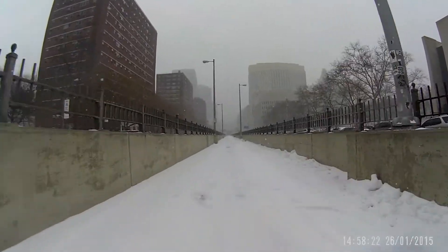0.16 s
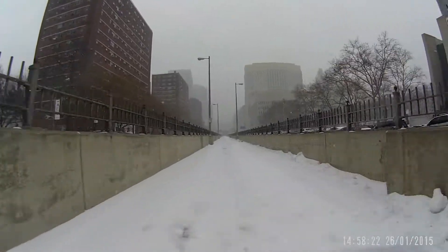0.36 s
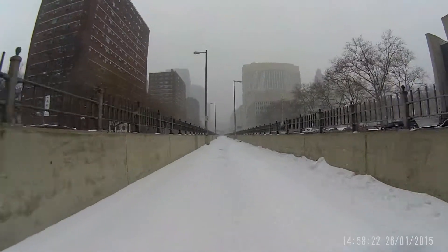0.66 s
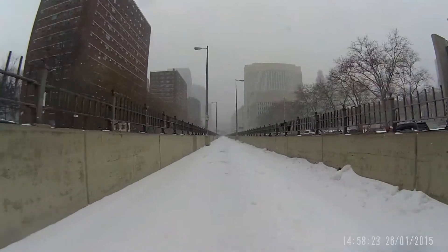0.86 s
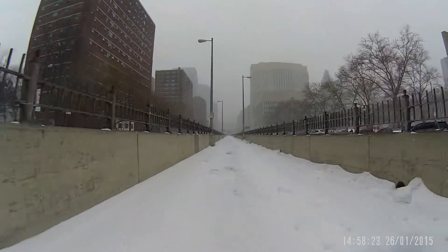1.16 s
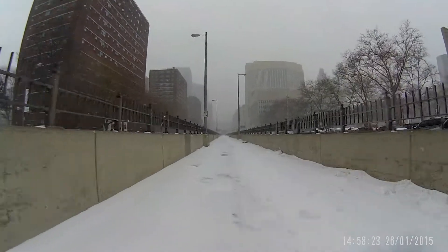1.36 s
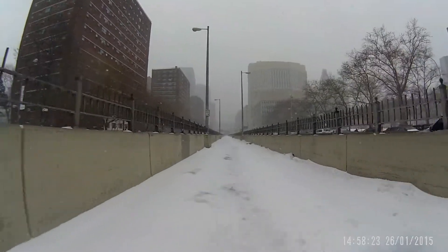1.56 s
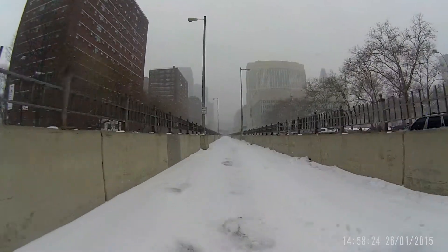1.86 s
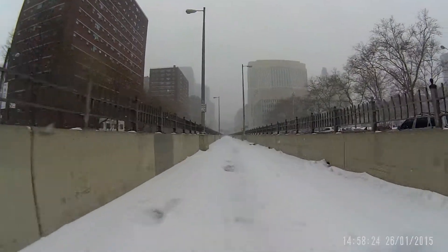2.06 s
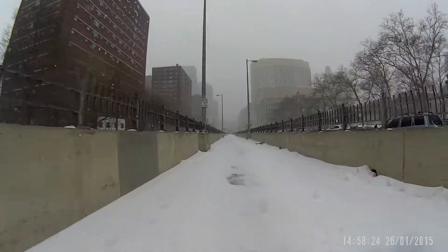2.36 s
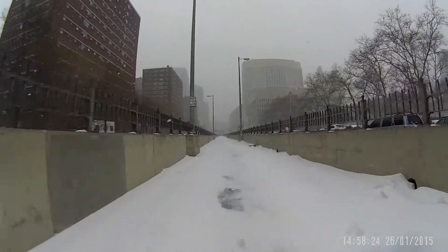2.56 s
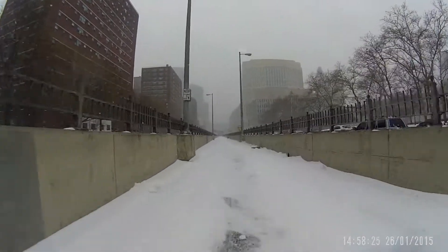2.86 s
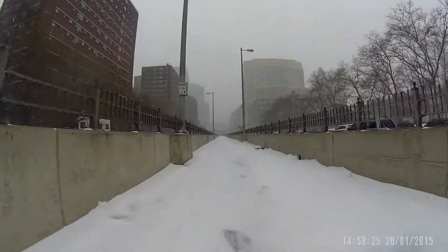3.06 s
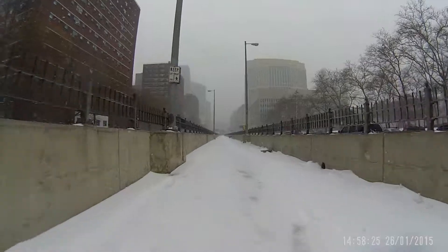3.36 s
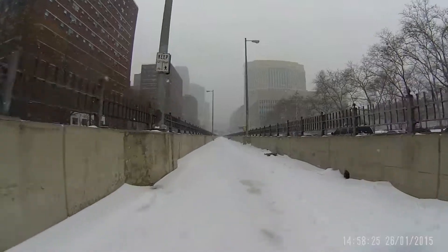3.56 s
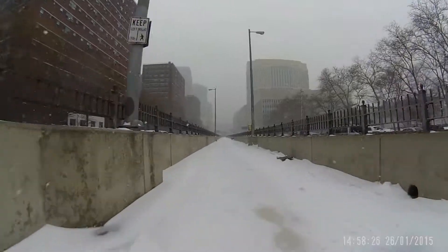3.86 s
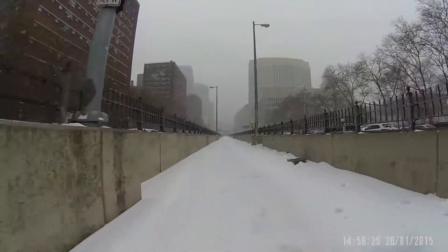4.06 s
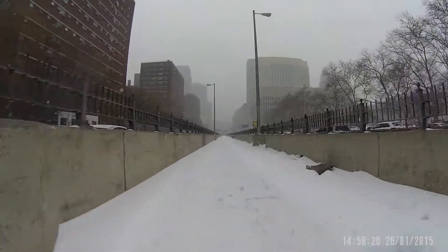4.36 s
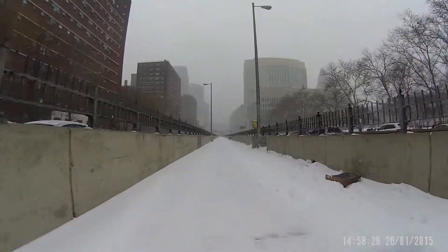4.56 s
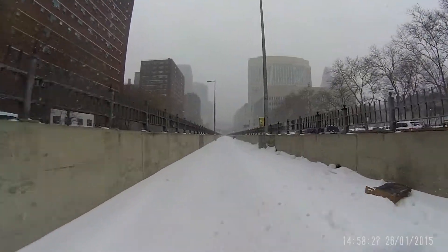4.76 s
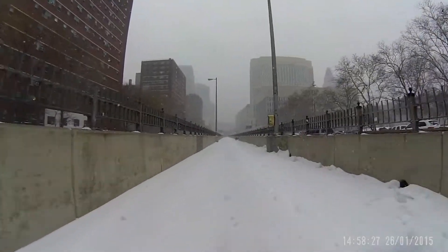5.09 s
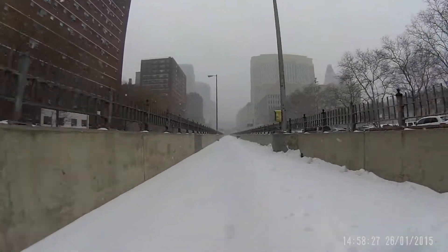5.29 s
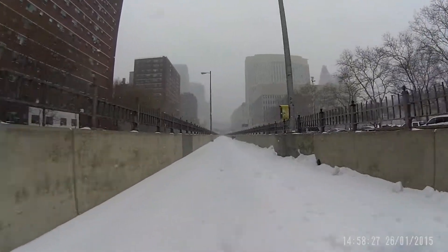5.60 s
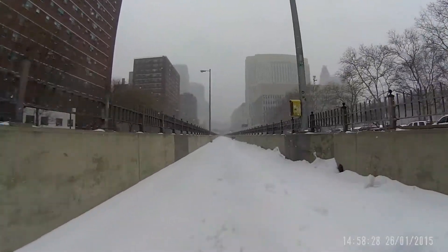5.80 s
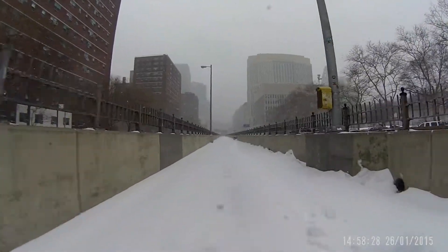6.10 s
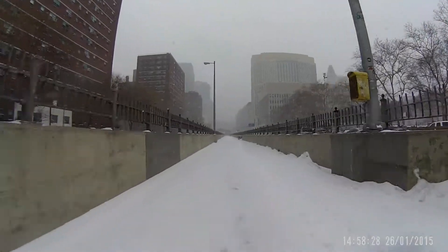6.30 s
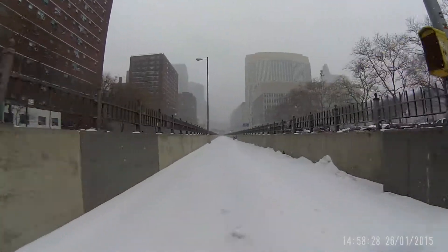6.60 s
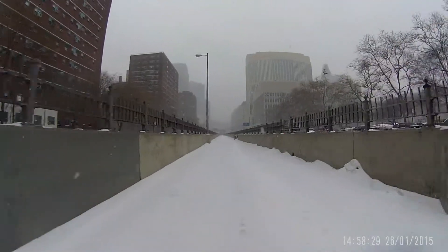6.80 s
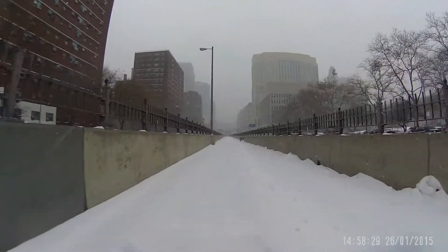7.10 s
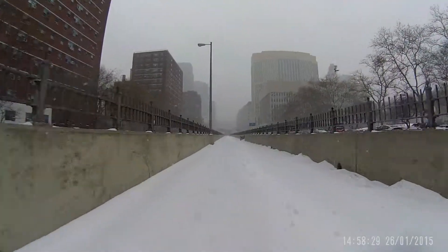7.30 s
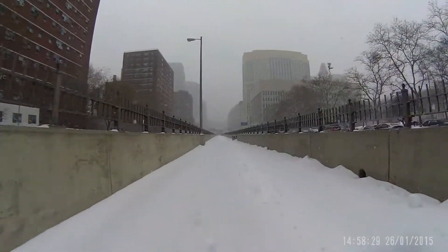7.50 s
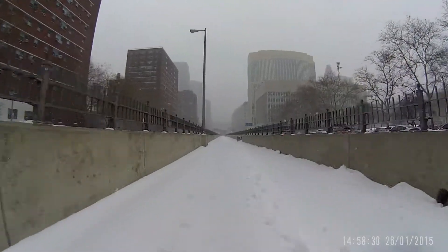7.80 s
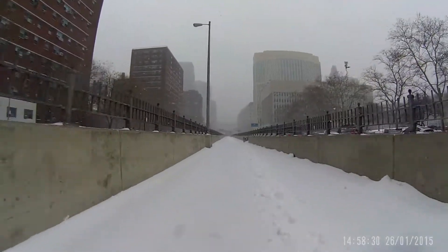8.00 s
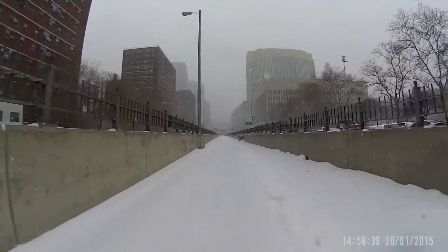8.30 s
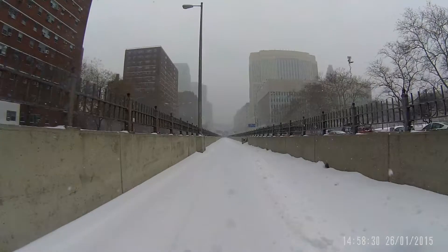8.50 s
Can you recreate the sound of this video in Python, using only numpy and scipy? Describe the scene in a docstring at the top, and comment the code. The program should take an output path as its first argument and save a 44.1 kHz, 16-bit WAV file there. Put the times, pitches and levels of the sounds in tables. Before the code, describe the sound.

Low, wavering rumble of a bike on a snowy path, heard from a frame-mounted enclosed microphone, with dull jolts, faint crackle and icy ticks.

```python
"""A bicycle rolls along a snow-covered path, heard inside a closed housing mounted on its frame.
From the start the frame's low resonances rumble, tyres churn, scrunch and crackle as filtered random
grains, and filtered noise makes soft wind and a faint hiss with a thin whine. Soon crust crumbles,
crystals snap, hollow notes and squeezed snow swell up, lumps pop, and booms and ruts jolt the bicycle.
Then the mount knocks in decaying sines, and after two seconds icy flakes tick on the housing."""
import sys
import numpy as np
from scipy import signal
from scipy.fft import rfft, irfft
from scipy.io import wavfile
from scipy.ndimage import uniform_filter1d

SR = 44100
rng = np.random.default_rng(int(sys.argv[2]) if len(sys.argv) > 2 else 0)


def wrap_up_sound(samples):
    """Save the sound to the file named by the first command line argument, as 16-bit audio."""
    columns = np.atleast_2d(samples).T
    # keep every value between -1 and 1, then stretch to whole-number steps
    tamed = np.clip(columns, -1, 1)
    steps = np.round(tamed * 32767).astype(np.int16)
    wavfile.write(sys.argv[1], SR, steps)


N = 381465
TIME = np.arange(N) / SR

# bumps in the packed snow: middle t/s, length/s, added shaking/dB re level snow,
# hardness/(dB per octave): soft swells below 0, fine ridges above
BUMPS = [(0.21, 0.08, 2, -8), (0.461, 0.069, 5.4, 2), (0.831, 0.23, 0.82, -3.5), (0.998, 0.023, 9.7, -1),
         (1.25, 0.2, 1.6, -8), (1.52, 0.029, 3.5, -5), (1.699, 0.025, 7.2, -7.5), (2.159, 0.03, 4.1, 4),
         (2.333, 0.034, 4, -7), (2.47, 0.049, 6.4, -14.5), (2.62, 0.081, 0.97, -4.5),
         (2.885, 0.034, 3.6, 0.5), (3.23, 0.077, 1.6, -3), (3.421, 0.068, 3.5, 0), (3.603, 0.036, 4.8, -22),
         (3.84, 0.041, 2.4, -5), (4.56, 0.039, 1.3, -23), (4.96, 0.092, 2.9, -2), (5.139, 0.048, 0.99, 0),
         (5.409, 0.023, 3.6, -4), (5.83, 0.078, 5.4, -6), (6.33, 0.057, 3.6, -6.5), (6.56, 0.16, 4.3, -5.5),
         (7.012, 0.014, 10.7, -8), (7.08, 0.038, 2, -3), (7.761, 0.019, 8.2, -1), (8.05, 0.094, 4.7, -3),
         (8.42, 0.055, 3, -13)]
# smooth patches where the frame calms: middle t/s, length/s
GLIDES = [(0.084, 0.035), (0.359, 0.025), (1.056, 0.022), (1.462, 0.02), (1.637, 0.092), (1.85, 0.07),
          (2.032, 0.065), (2.22, 0.034), (2.403, 0.036), (2.795, 0.03), (3.043, 0.062), (3.528, 0.068),
          (3.756, 0.034), (4.07, 0.096), (4.658, 0.073), (5.33, 0.041), (5.538, 0.035), (5.957, 0.02),
          (6.17, 0.039), (6.86, 0.026), (7.86, 0.054)]
GLIDE_DB = -5  # shaking on a smooth patch, relative to level snow

# resonances of frame, fork and mount: f/Hz, width/Hz, level/dB
FRAME_MODES = [(83.8, 20.2, -9.5), (95.4, 25.2, -6.5), (119.5, 12.1, 1), (141.3, 27.6, -1.5),
               (178.67, 18.5, -3), (194.2, 13.6, -1.5), (215.8, 38, -15.5)]
FRAME_DB, FRAME_WAVER_DB = -41, 1.13  # rumble on level snow; wander of its level
MODE_WAVER_DB, MODE_DRIFT = 2.0, 0.015  # each resonance's own wander: level; pitch as a share

# softer and firmer stretches of snow under the tyres: t/s, churn level/dB, scrunch level/dB
SNOW = [(0.1, -55.5, -70.5), (0.33, -56.5, -73), (0.39, -51.5, -70.5), (0.59, -54.5, -70), (0.63, -57, -71),
        (0.85, -56, -77), (1.05, -57, -71.5), (1.65, -59, -71), (1.78, -56, -70.5), (3.05, -58, -72.5),
        (3.35, -55, -72.5), (3.55, -57.5, -72.5), (3.85, -55.5, -71), (4.65, -59.5, -72),
        (5.65, -59, -74.5), (5.97, -58, -68.5), (6.5, -58.5, -72.5), (7.85, -59.5, -73), (8.62, -59.5, -72)]
# crisp crust breaking under the tyres: t/s, level/dB
CRUST = [(0.1, -82), (0.25, -81.5), (1.25, -80.5), (1.6, -84), (1.74, -81), (2.65, -83.5), (3.35, -86),
         (3.68, -80), (4.2, -83), (4.75, -85), (5.1, -85.5), (5.8, -85), (5.93, -83.5), (6.2, -84.5),
         (6.65, -85.5), (7.1, -84.5), (7.38, -82.5), (7.9, -87.5), (8.35, -83), (8.62, -88)]
# tyre churn carried through the mount: f/Hz, level/(dB per Hz)
CHURN = [(150, -13), (250, 0), (305, 2), (390, -2), (470, -6.5), (575, -4), (640, -10), (690, -7),
         (760, -18), (1000, -29.5), (2500, -62.5)]
# scrunch of firmer snow: f/Hz, level/(dB per Hz)
SCRUNCH = [(300, -8), (750, 2.5), (900, 3), (1100, 0), (1330, -11), (1550, -22), (1800, -15.5), (2600, -21),
           (5000, -50)]
# housing resonances that grains set ringing: f/Hz, width/Hz, level/dB
SHELL_MODES = [(1545, 250, 0.5), (2640, 3200, 2.5), (3740, 200, -3.5), (4070, 120, -2.5),
               (4300, 1200, -10.5), (5000, 400, -3.5), (6230, 310, -6.5), (7230, 580, -3),
               (8250, 560, -7.5), (11400, 2200, -13)]
CRUNCH_DB = 0.5  # coarse crunch, relative to the crust
CRYSTAL_TOP_HZ = 8900  # breaking crust has little above this
# dB gained for each dB of load
CHURN_PER_LOAD, SCRUNCH_PER_LOAD, CRUNCH_PER_LOAD, BUFFET_PER_LOAD = 0.41, 0.19, 0.17, 0.12
# pitches of the finest crackle: f/Hz, width/Hz, level/dB re crust
CRACKLE_MODES = [(1500, 380, -3), (3955, 800, -8.5), (5010, 680, -10.5), (7250, 1000, -11.5)]

# larger lumps of snow collapsing under a tyre: t/s, peak level/dB, brightness/(dB per octave)
LUMPS = [(0.417, -48, 0), (0.810, -45, 0), (0.869, -50, 0), (1.051, -44.5, -1), (1.273, -45.5, -1),
         (1.514, -49.5, 0), (1.845, -41.5, 4.5), (2.523, -48, -2), (3.252, -46, -4), (3.407, -43, -5),
         (3.935, -44.5, -3), (4.779, -48.5, 0), (5.104, -49, -3), (6.045, -49, -1), (6.167, -48, -1),
         (6.429, -45, 0), (6.497, -44.5, 2), (6.685, -49, -3), (6.758, -45.5, 0), (7.665, -46, -1),
         (8.308, -50, 0), (8.403, -51, -1)]
# dull pop of a collapsing lump: f/Hz, level/dB
POP = [(150, -26.5), (330, 8), (600, 5.5), (900, -6), (1450, -14.5), (2000, -30.5), (5000, -47),
       (16000, -87)]

# gusts pressing on the housing: t/s, level/dB
WIND = [(0.35, -65), (0.85, -54), (1.4, -61), (2.0, -62), (2.4, -59.5), (2.95, -69), (3.45, -68),
        (3.8, -54), (4.1, -63), (4.9, -61), (5.5, -72), (5.9, -60.5), (6.6, -68), (7.4, -60.5), (7.8, -66),
        (8.35, -67), (8.62, -59)]
# low tone of the buffeting: f/Hz, level/dB
BUFFET = [(15, -4.0), (30, 5.5), (50, 5.0), (75, -3.5), (150, -16.5), (500, -70.0)]
# steady hiss of the microphone: f/Hz, level/(dB per Hz)
HISS = [(100, 2), (1500, 5.5), (2600, 3.5), (3200, -2), (4000, -3), (5000, -5.5), (5900, -6.5), (7300, -9),
        (9500, -9.5), (12500, -9.5), (14000, -39.5), (16000, -30)]

# brittle crust crumbling in clusters of grains: middle t/s, length/s, level/dB
CRUMBLES = [(0.212, .04, -78), (0.307, .03, -76), (0.5, 0.055, -81), (0.657, 0.031, -74), (0.806, .06, -84),
            (0.924, .05, -74), (1.198, .07, -76), (1.776, .06, -83), (2.016, 0.027, -83), (2.54, .05, -79),
            (3.684, .06, -80), (4.235, 0.039, -74.5), (4.59, 0.038, -78), (4.78, .035, -74),
            (4.95, 0.045, -82), (5.643, 0.015, -74.5), (5.93, .02, -75), (5.985, .03, -77),
            (6.38, .03, -86), (6.67, 0.072, -77), (7.39, .03, -76), (8.1, .05, -75.5), (8.352, 0.058, -82)]
# ruts jolting the bicycle: t/s, thump level/dB, crushed snow level/dB
RUTS = [(0.479, -39, -75), (0.881, -45, -76), (1.704, -39, -71), (2.152, -45, -85), (2.344, -41, -78),
        (2.368, -55, -64), (4.581, -60, -74), (4.948, -38, -69), (5.65, -42, -76), (5.93, -41, -68),
        (6.381, -41, -74), (7.02, -55, -68), (7.4982, -35, -83), (8.329, -43, -69)]
# snow crushed in a rut: half length; levels of its grit and crust
CRUSH_S, CRUSH_GRIT_DB, CRUSH_CRUST_DB = 0.016, -2.5, -9

# single larger crystals snapping: t/s, peak level/dB, f/Hz
SNAPS = [(0.2864, -64, 4940), (0.501, -60, 4960), (0.7223, -68, 4720), (0.7746, -67, 7470),
         (0.8205, -61, 5190), (0.9123, -63, 4690), (0.9294, -65, 5020), (1.2935, -63, 5030),
         (1.765, -66, 4740), (1.7868, -62, 4620), (1.9305, -65, 4980), (1.9904, -69, 5260),
         (2.0088, -64, 5030), (2.3271, -60, 4780), (2.362, -57.5, 4850), (2.9612, -63, 4800),
         (3.6272, -65, 7280), (4.1739, -64, 5160), (4.4034, -63, 4690), (4.6243, -58, 5030),
         (4.7706, -66, 4900), (5.9214, -57.5, 4540), (5.9374, -67, 4770), (5.9678, -64, 5000),
         (6.114, -64, 5100), (6.3769, -66, 5180), (6.5914, -66, 4760), (6.6009, -62, 7130),
         (6.6763, -64, 5160), (7.3801, -67, 7080), (7.641, -63, 5090), (8.3354, -67, 5350),
         (8.3649, -61, 4920)]
# colour of such a snap: f/Hz, level/dB
SNAP = [(500, -22), (1500, -10), (2800, -11.5), (4000, 7.5), (5000, -1.5), (5900, -7), (7300, 1.5),
        (8500, 3), (10000, -13), (15000, -35)]
# passing hollow notes in the churn: middle t/s, length/s, f/Hz, level/dB
HOLLOWS = [(0.327, 0.072, 553, -60), (2.154, 0.068, 290, -56), (2.248, 0.051, 550, -73),
           (3.15, 0.34, 300, -56.5), (3.28, 0.091, 308, -60), (3.43, 0.072, 550, -56.5),
           (3.464, 0.046, 328, -59), (3.83, 0.14, 553, -59), (3.954, 0.045, 540, -58),
           (4.26, 0.1, 552, -58.5), (4.417, 0.098, 576, -61), (6.003, 0.22, 301, -56),
           (6.474, 0.16, 347, -60), (7.683, 0.49, 554, -68.5)]
# firm snow giving way in scrunching bursts: middle t/s, length/s, level/dB
SQUEEZES = [(0.366, 0.013, -62), (0.38, 0.01, -57), (0.407, .007, -57), (0.42, 0.012, -57),
            (0.437, .012, -56), (0.459, 0.022, -57.5), (0.495, 0.022, -57), (0.511, 0.0092, -58.5),
            (0.555, 0.022, -56.5), (0.572, 0.0068, -56), (0.578, 0.011, -54), (0.732, 0.016, -60),
            (0.829, 0.02, -57), (0.866, .018, -56), (2.353, .022, -56.5), (5.885, 0.0091, -57.5),
            (6.01, 0.048, -73), (6.436, .025, -60), (6.502, 0.024, -57.5)]
# colour of such a burst: f/Hz, level/(dB per Hz)
SQUEEZE = [(200, -29.5), (420, 13.5), (600, 6), (850, 5), (1300, -1), (1650, -5), (2000, -18.5),
           (5000, -45)]
# bumps that set one frame resonance booming: middle t/s, length/s, f/Hz, level/dB
RINGS = [(0.482, 0.069, 120, -34), (0.856, 0.13, 79, -39), (0.932, 0.094, 195, -38),
         (2.15, 0.13, 86, -39.5), (2.317, 0.12, 121, -31.5), (2.88, 0.081, 122, -35),
         (3.266, 0.22, 124, -40), (3.712, 0.089, 116, -40), (3.928, .15, 106, -48.5),
         (4.355, 0.055, 120, -31.5), (4.762, .1, 120, -38.5), (5.154, .12, 119, -35),
         (5.487, 0.065, 84, -39.5), (6.737, 0.14, 119, -37.5), (7.312, 0.093, 82, -40.5),
         (8.03, 0.14, 119, -39)]

# the mount knocking in its play: t/s, level/dB, brightness/(dB per octave)
KNOCKS = [(0.88, -65, 1), (1.705, -60, 0.5), (2.152, -63, -8), (2.174, -64, -1), (2.346, -58.5, 2.5),
          (2.371, -58.5, -2), (4.934, -66, 0), (4.950, -65, -1), (4.9545, -60, -6), (4.9726, -59.5, -4),
          (5.922, -61, -8), (6.348, -64, -3), (6.378, -65, -4), (6.411, -64, -7), (7.4961, -60, 3.5),
          (7.4996, -54, 1), (7.518, -64, -4)]
# resonances of the mount: f/Hz, decay/s, level/dB
MOUNT_MODES = [(830, 0.00067, 1), (1550, 0.0023, 0.5), (2420, 0.00023, 5.5), (3540, 0.0017, -8),
               (4420, 0.0011, -1.5), (5130, 0.00072, -4), (6430, 0.00097, -6), (8160, 0.00086, -15)]
# flakes striking the housing: t/s, peak level/dB, brightness/(dB per octave),
# struck spot f/Hz, its ring level/dB, top of the tick f/Hz
FLAKES = [(2.219, -44, 8.5, 7200, 3, 13500), (3.0818, -29.5, 3, 4800, -11, 15000),
          (3.654, -53, 13, 9000, 10, 12500), (3.669, -48, 11, 4900, -4, 8500),
          (3.713, -44, 10, 4600, -14, 9300), (3.737, -58, 12, 8000, 2, 12000),
          (4.064, -54, 15, 5200, 10, 13000), (4.102, -50, 6, 2200, 9, 13500),
          (5.027, -51.5, 11, 7840, 2, 13500), (5.91, -61, 9, 7400, 3, 12000),
          (6.526, -56, 8, 7040, -1, 13500), (6.928, -52, 8, 6500, 7, 13000)]
# response of the housing to a tiny knock: f/Hz, level/dB
HOUSING = [(300, 2), (600, 16), (1000, 7.5), (2300, 7), (3500, 2), (5100, 3.5), (5800, -11), (6400, -4.5),
           (7500, -3.5), (9500, -16.5), (10600, -12), (13600, -12.5), (14600, -33), (16000, -60)]
TOP_HZ = 15800  # top of the whole sound


def undb(db):
    """Decibels to gain."""
    return 10 ** (np.asarray(db) / 20)


def unit(x):
    """Scale to rms 1."""
    return x / np.sqrt(np.mean(x ** 2))


def curve(table, column):
    """One column of a control table, interpolated at every sample."""
    rows = np.array(table)
    return np.interp(TIME, rows[:, 0], rows[:, column])


def swell(middle, length):
    """A smooth rise and fall, 1 at its middle."""
    out = np.zeros(N)
    near = slice(*np.searchsorted(TIME, [middle - 2 * length, middle + 2 * length]))
    out[near] = np.exp(-(2 * (TIME[near] - middle) / length) ** 2)
    return out


def colour(x, points, tilt_db=0, size=2048):
    """Causal minimum-phase filter through (Hz, dB) points, tilted by so many dB an octave."""
    hz, db = np.transpose(points)
    octave = np.log2(np.maximum(np.arange(size // 2 + 1), 1) * SR / size)
    gain_db = np.interp(octave, np.log2(hz), db) + tilt_db * (octave - np.mean(octave))
    # folding the cepstrum onto positive time makes the filter causal
    cepstrum = irfft(np.log(undb(gain_db)))
    cepstrum[1:size // 2] *= 2
    cepstrum[size // 2 + 1:] = 0
    impulse = irfft(np.exp(rfft(cepstrum)))
    return signal.fftconvolve(x, impulse)[:len(x)]


def resonate(x, hz, width):
    """A steep resonance: the same band-pass twice."""
    b, a = signal.iirpeak(hz, hz / width, fs=SR)
    return signal.lfilter(b, a, signal.lfilter(b, a, x))


def soften(x, top_hz):
    """A softer contact takes away the treble above this pitch."""
    return signal.sosfilt(signal.butter(8, min(top_hz, .45 * SR), fs=SR, output="sos"), x)


def steady(x, seconds):
    """Hold a vibration near rms 1 over spans of this length; quicker beating stays."""
    span = int(seconds * SR)
    power = uniform_filter1d(uniform_filter1d(x ** 2, span), span)
    return x / np.sqrt(power + 1e-18)


def walk(rate):
    """A smooth random wander: levels held 1 / rate s, slewed twice and scaled to rms 1."""
    span = int(SR / rate)
    held = rng.standard_normal(4096)[np.arange(N) // span]
    return unit(uniform_filter1d(uniform_filter1d(held, span), span))


def grains(rate, spread_db):
    """Random tiny fractures, rate a second: many weak, a few strong; reversed by a negative spread."""
    hit = rng.random(N) < rate / SR
    strength = np.minimum(rng.exponential(size=N), 4.5)
    return hit * np.sign(rng.standard_normal(N)) * undb(spread_db * strength)


def add(out, start, sound):
    """Mix a short sound in at a given time."""
    i = max(int(start * SR), 0)
    out[i:i + len(sound)] += sound[:N - i]


def shell(force, scatter_db=13):
    """Every impact strikes a different spot, so it rings its own mix of the housing's resonances."""
    out = 0
    for hz, width, db in SHELL_MODES:
        sign = np.sign(rng.standard_normal(len(force)))
        share = undb(scatter_db * (2 * rng.random(len(force)) - 1)) * sign
        ring = resonate(force * share, hz, width * np.pi / 2)
        out = out + undb(db) * ring / np.sqrt(width)
    return out


def load():
    """Bumps press and smooth patches relieve: shaking in dB re level snow, hardness in dB an octave."""
    power, tilt = np.ones(N), np.zeros(N)
    for middle, length, db, hard_db in BUMPS:
        push = undb(db) ** 2 * swell(middle, length)
        power, tilt = power + push, tilt + push * hard_db
    calm = sum(swell(middle, length) for middle, length in GLIDES)
    return 10 * np.log10(power) + GLIDE_DB * calm, tilt / power


def frame(load_db, tilt_db):
    """The uneven path keeps the frame ringing; harder bumps favour its higher resonances."""
    rumble = 0
    for hz, width, db in FRAME_MODES:
        mode = steady(resonate(rng.standard_normal(N), hz, width), seconds=.5) * np.sqrt(width)
        # a wandering clock bends the pitch
        clock = TIME + MODE_DRIFT * np.cumsum(walk(rate=4)) / SR
        mode = np.interp(clock, TIME, mode, left=0, right=0)
        mode_db = db + tilt_db * np.log2(hz / 130) + MODE_WAVER_DB * walk(rate=7)
        rumble = rumble + mode * undb(mode_db)
    return steady(rumble, seconds=0.17) * undb(FRAME_DB + load_db + FRAME_WAVER_DB * walk(rate=10))


def tyres(load_db):
    """Snow packs in uneven slips: dull churn, gritty scrunch, fine crunch of crystals, harder on bumps."""
    slips = walk(rate=60)  # shared, so churn and scrunch flicker together
    churn_db = curve(SNOW, column=1) + CHURN_PER_LOAD * load_db + 1.41 * slips
    scrunch_db = curve(SNOW, column=2) + SCRUNCH_PER_LOAD * load_db + 1.6 * slips + 1.1 * walk(rate=25)
    crunch_db = curve(CRUST, column=1) + CRUNCH_PER_LOAD * load_db + 1.6 * walk(rate=32)
    churn = steady(colour(grains(rate=2500, spread_db=3.0), CHURN), seconds=0.26)
    scrunch = steady(colour(grains(rate=600, spread_db=2.0), SCRUNCH), seconds=0.069)
    crystals = grains(rate=450, spread_db=2.5) * undb(4 * np.tanh(walk(rate=160)))
    crunch = steady(soften(shell(crystals), CRYSTAL_TOP_HZ), seconds=0.19)
    return churn * undb(churn_db) + scrunch * undb(scrunch_db) + crunch * undb(crunch_db + CRUNCH_DB)


def fine_crackle(load_db, rate=260, spread_db=5.0):
    """Single crystals snap under the tyres, each faintly ringing just one pitch of the housing."""
    pings = 0
    for hz, width, db in CRACKLE_MODES:
        ping = resonate(grains(rate, spread_db), hz, width)
        pings = pings + undb(db) * steady(ping, seconds=0.12)
    return pings * undb(curve(CRUST, column=1) + CRUNCH_PER_LOAD * load_db)


def lumps(crumble_db=-26, crumble_s=0.0035, small_db=-9, size=2048):
    """A lump breaks in a dull pop and crumbles for milliseconds; small ones pop at random throughout."""
    out, age = np.zeros(N), np.arange(size) / SR
    for start, db, bright_db in LUMPS:
        pop = colour(signal.unit_impulse(size), POP, tilt_db=bright_db)
        crumbs = undb(crumble_db) * rng.standard_normal(size) * np.exp(-age / crumble_s)
        pop = pop + signal.fftconvolve(pop, crumbs)[:size]
        add(out, start, pop * undb(db) / np.abs(pop).max())
    small = unit(colour(grains(rate=18, spread_db=1.8), POP))
    return out + small * undb(curve(SNOW, column=2) + small_db)  # follows the scrunch level


def wind(load_db):
    """Head wind buffets the housing, low and soft, fluttering in gusts and swelling on bumps."""
    buffet = steady(colour(rng.standard_normal(N), BUFFET), seconds=0.054)
    return buffet * undb(curve(WIND, column=1) + BUFFET_PER_LOAD * load_db + 0.7 * walk(rate=7.1))


def hiss(whine_hz=10520):
    """The microphone's steady noise and a very thin electronic whine."""
    noise = unit(colour(rng.standard_normal(N), HISS))
    return undb(-77.5) * noise + undb(-96.5) * np.sin(2 * np.pi * whine_hz * TIME)


def crushed_snow():
    """Brittle patches crumble and ruts crush snow: short ragged bursts of crystals and grit."""
    press_power = sum(undb(crush_db) ** 2 * swell(middle, 2 * CRUSH_S) for middle, _, crush_db in RUTS)
    press = np.sqrt(press_power)
    grit = steady(colour(grains(rate=1100, spread_db=-8.0), SCRUNCH), seconds=0.048)
    crust = steady(soften(shell(grains(rate=1100, spread_db=5.0)), CRYSTAL_TOP_HZ), seconds=0.011)
    brittle = sum(undb(db) * swell(middle, length) for middle, length, db in CRUMBLES)
    return press * (undb(CRUSH_GRIT_DB) * grit + undb(CRUSH_CRUST_DB) * crust) + brittle * crust


def snaps(crumble_s=0.002, ring_db=6, ring_width_hz=800, size=1024):
    """A larger crystal breaks in a few milliseconds of noise and rings one pitch of the housing."""
    out, age = np.zeros(N), np.arange(size) / SR
    for start, db, hz in SNAPS:
        snap = colour(rng.standard_normal(size) * np.exp(-age / crumble_s), SNAP)
        snap = snap + undb(ring_db) * resonate(snap, hz, ring_width_hz)
        add(out, start, snap * undb(db) / np.abs(snap).max())
    return out


def hollows(width_hz=95):
    """Here and there a short hollow note swells: random slips through one narrow resonance."""
    slips = grains(rate=2000, spread_db=2.5)
    out = 0
    for middle, length, hz, db in HOLLOWS:
        note = steady(resonate(slips, hz, width_hz), seconds=0.072)
        out = out + undb(db) * swell(middle, length) * note
    return out


def squeezes():
    """Firm snow yields in bursts, each a quick run of coarse slips."""
    press = sum(undb(db) * swell(middle, length) for middle, length, db in SQUEEZES)
    return press * steady(colour(grains(rate=700, spread_db=-3.0), SQUEEZE), seconds=0.012)


def rings(drift=0.01973):
    """Some bumps catch one resonance, which booms almost as a tone, its pitch drifting slightly."""
    clock = TIME + drift * np.cumsum(walk(rate=25)) / SR
    out = 0
    for middle, length, hz, db in RINGS:
        out = out + undb(db) * swell(middle, length) * np.sin(2 * np.pi * hz * clock)
    return out


def ruts(thump_hz=56, thump_s=0.0075, size=8192):
    """A rut bounces the bicycle on its tyres: a low sine under a short bell-shaped envelope."""
    out, lead = np.zeros(N), size / 2 / SR
    age = np.arange(size) / SR - lead
    thump = np.exp(-(age / thump_s) ** 2) * np.sin(2 * np.pi * thump_hz * age)
    for start, thump_db, _ in RUTS:
        add(out, start - lead, undb(thump_db) * thump)
    return out


def knocks(scatter_db=1.0, detune=0.043, chatter_db=-25, chatter_s=.003, size=1024):
    """Jolts knock the mount; each knock chatters briefly and rings its resonances a little differently."""
    out, age = np.zeros(N), np.arange(size) / SR
    hz, decay, mode_db = np.transpose(MOUNT_MODES)
    for start, db, bright_db in KNOCKS:
        share, shift = rng.standard_normal((2, len(hz)))
        gain = undb(db + mode_db + bright_db * np.log2(hz / 2000) + scatter_db * share)
        phase = 2 * np.pi * age[:, None] * hz * (1 + detune * shift)
        modes = np.exp(-age[:, None] / decay) * np.sin(phase)
        chatter = undb(chatter_db) * rng.standard_normal(size) * np.exp(-age / chatter_s)
        contact = signal.unit_impulse(size) + chatter
        add(out, start, soften(signal.fftconvolve(contact, modes @ gain), top_hz=8040))
    return out


def flakes(ring_width_hz=1400, size=1024):
    """An icy flake briefly rings the housing, each with its own pitch, brightness and top."""
    out = np.zeros(N)
    for start, db, bright_db, ring_hz, ring_db, top_hz in FLAKES:
        tick = colour(signal.unit_impulse(size), HOUSING, tilt_db=bright_db)
        tick = soften(tick + undb(ring_db) * resonate(tick, ring_hz, ring_width_hz), top_hz)
        add(out, start, tick * undb(db) / np.abs(tick).max())
    return out


def scene():
    """Everything reaches the one microphone through the housing, with no echo."""
    load_db, tilt_db = load()
    rolling = frame(load_db, tilt_db) + tyres(load_db) + fine_crackle(load_db) + lumps()
    air = wind(load_db) + hiss()
    snow = crushed_snow() + snaps() + hollows() + squeezes()
    jolts = rings() + ruts() + knocks()
    return (rolling + air + snow + jolts + flakes())[None]


def record(dry):
    """A steep low-pass cuts the top treble."""
    return signal.sosfilt(signal.ellip(8, .2, 70, TOP_HZ, fs=SR, output="sos"), dry)


dry = scene()
out = record(dry)
wrap_up_sound(out)
```